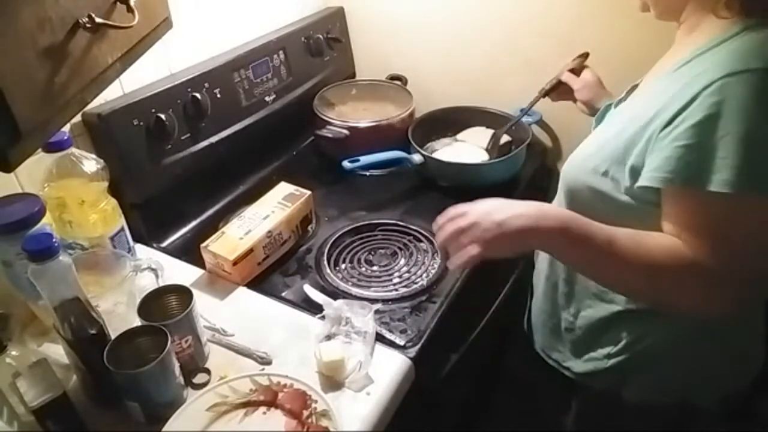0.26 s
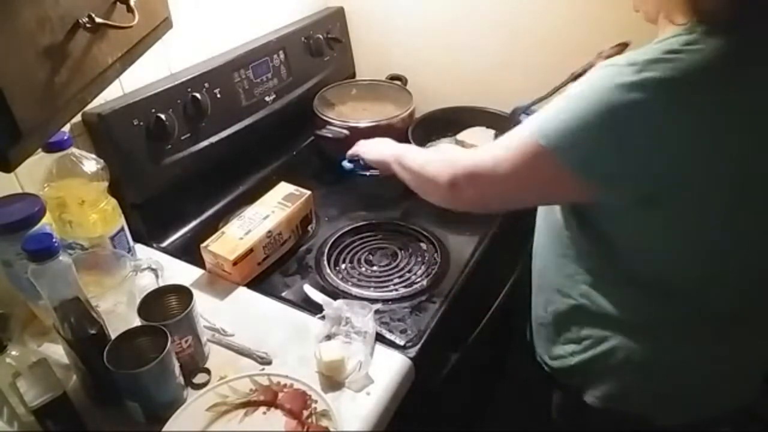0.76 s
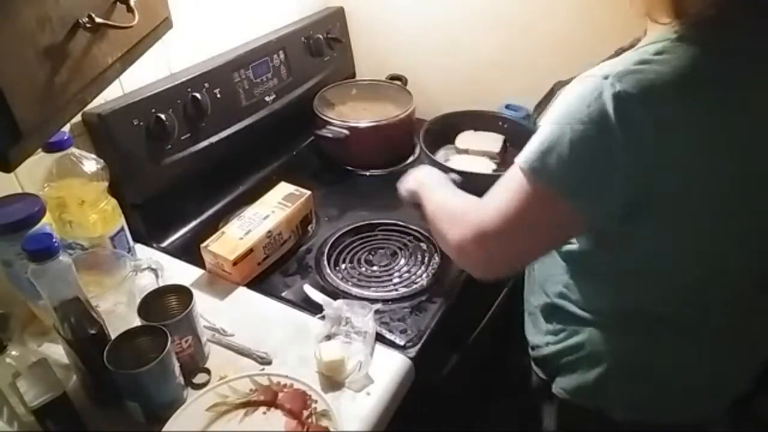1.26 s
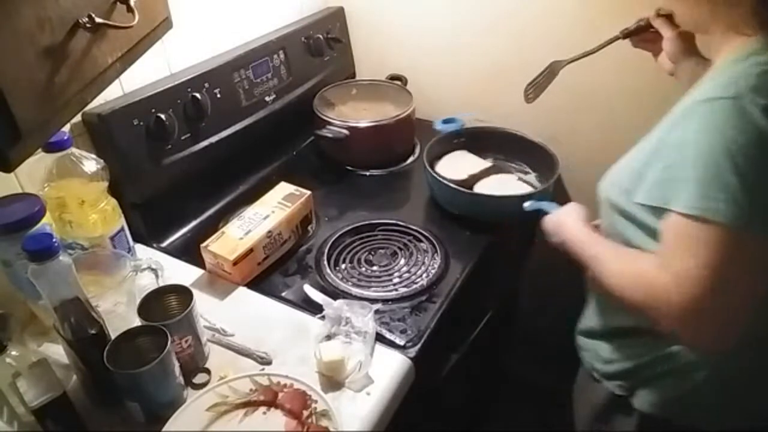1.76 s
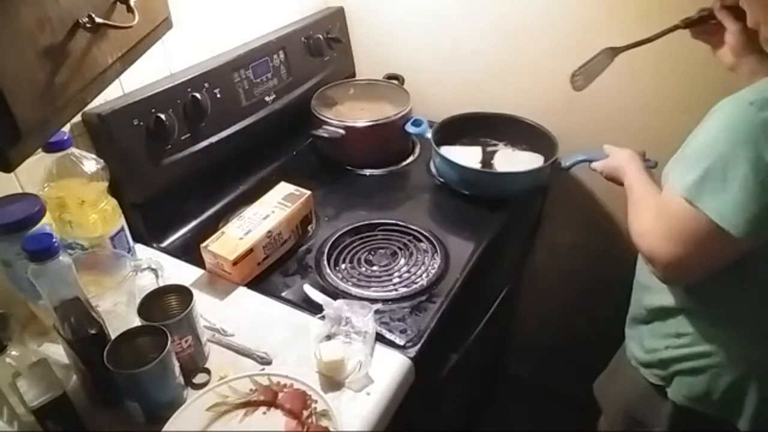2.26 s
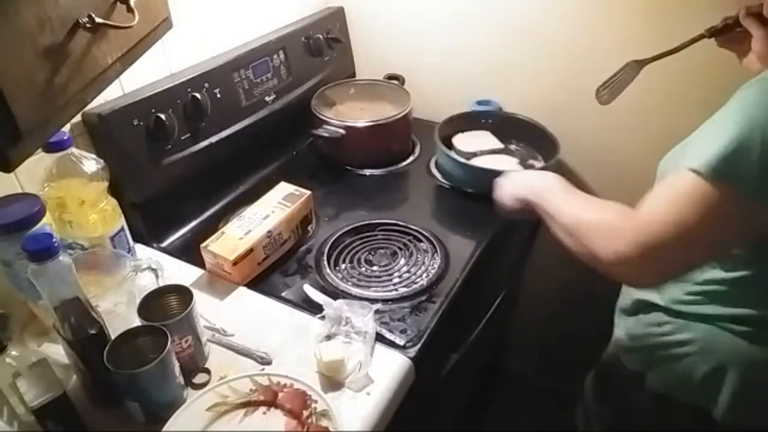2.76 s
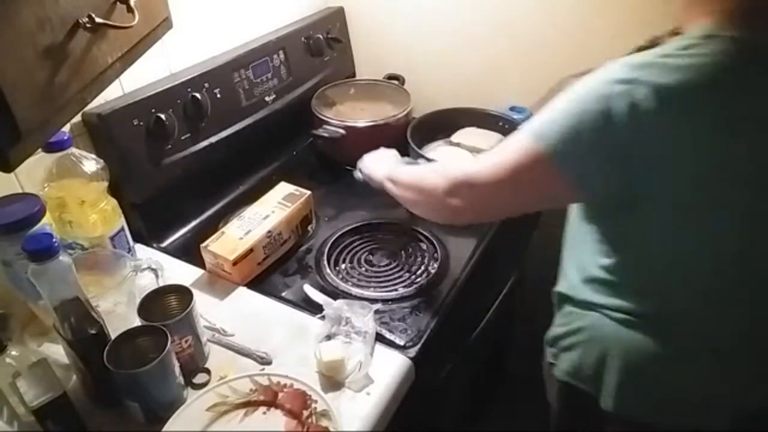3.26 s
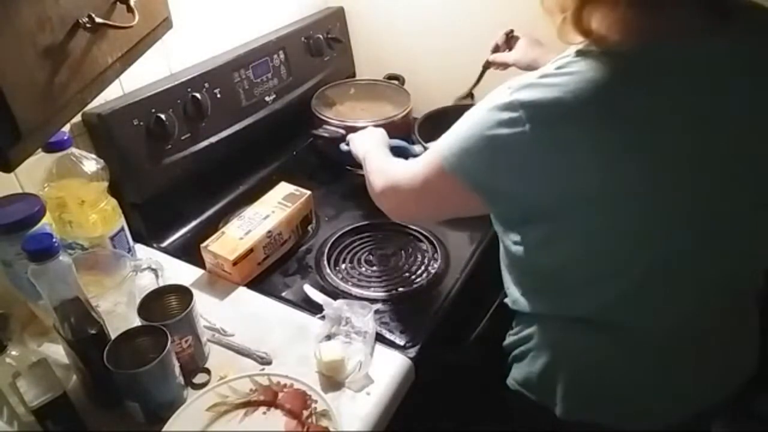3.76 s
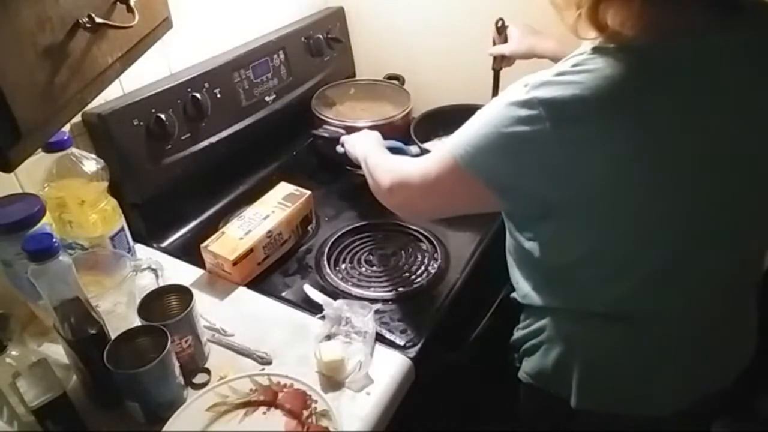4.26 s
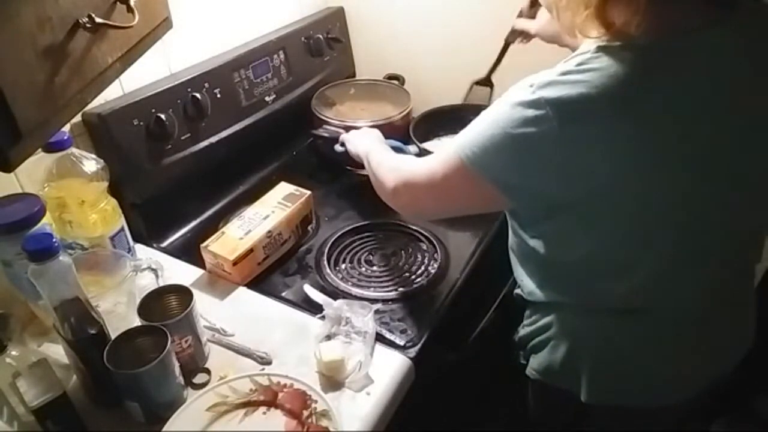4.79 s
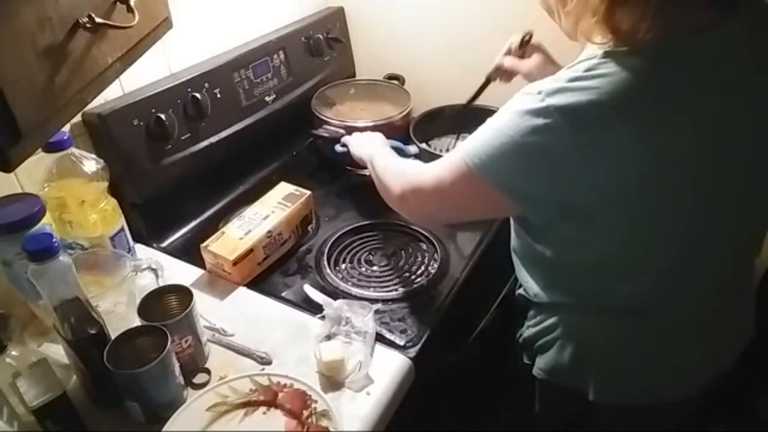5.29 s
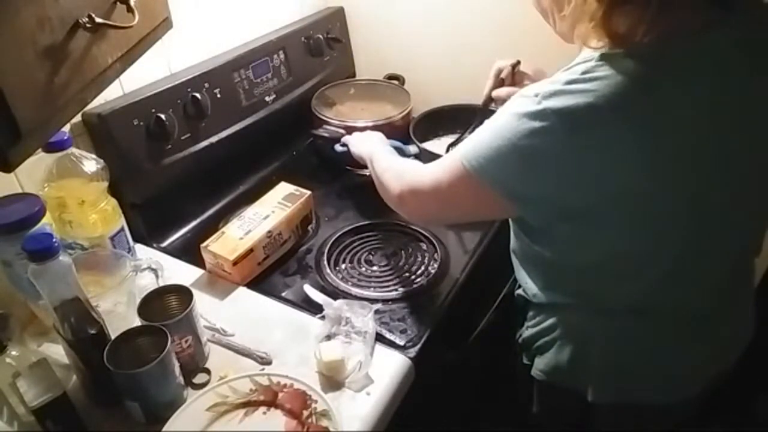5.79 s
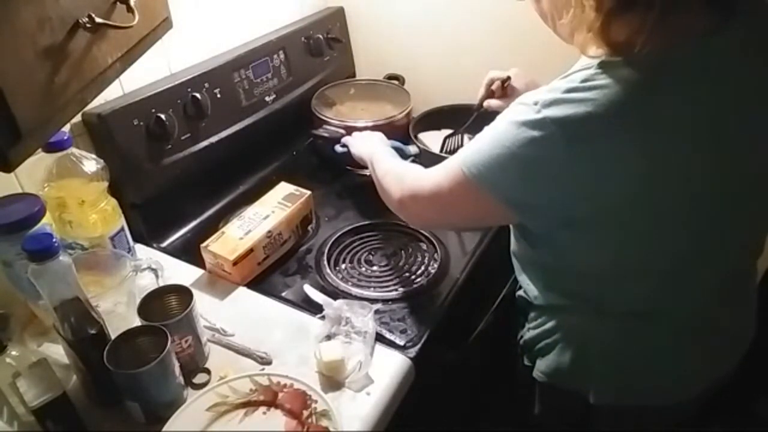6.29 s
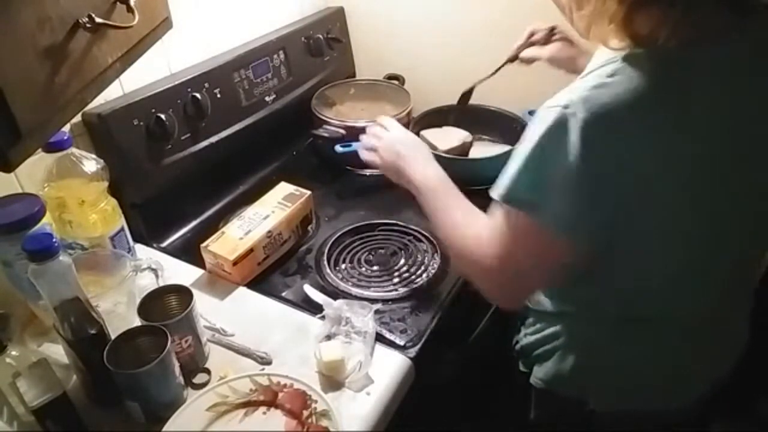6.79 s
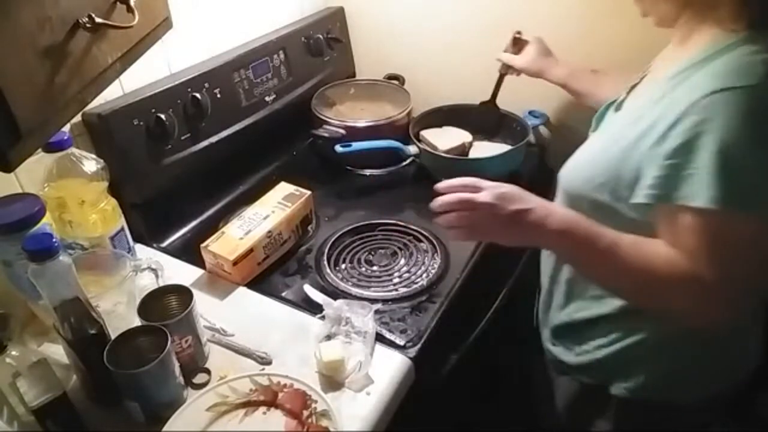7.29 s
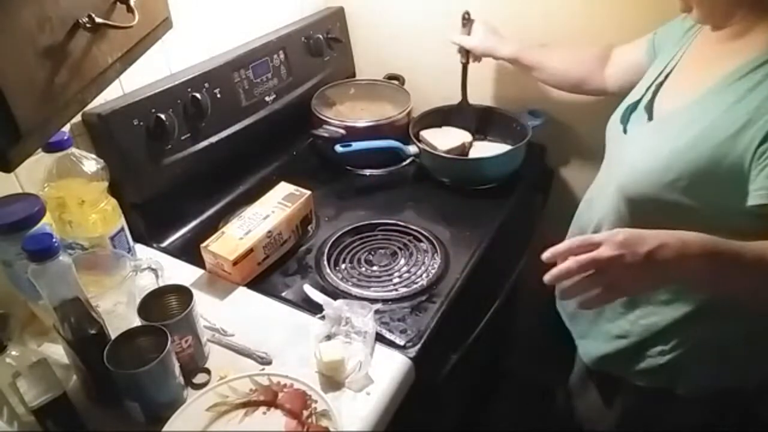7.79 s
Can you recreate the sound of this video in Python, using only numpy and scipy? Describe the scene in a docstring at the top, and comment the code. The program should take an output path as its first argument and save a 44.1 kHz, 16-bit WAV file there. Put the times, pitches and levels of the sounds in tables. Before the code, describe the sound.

A heavy skillet scrapes, clanks and bumps across an electric stove coil, then a spatula taps and rubs in the pan over a steady fan hum.

```python
"""A skillet is dragged round on the coil of an electric range in a small kitchen: it scrapes, clanks and bumps down.
A spatula pushes food about and taps the pan, at the start and again after the dragging.
A fan hums throughout and the fat crackles faintly.
Blows are clicks with rebounds that ring damped modes; scraping and rubbing are dense random slips that
excite resonances; the fat is sparse clicks; the fan is wavering sines over coloured noise."""
import sys
import numpy as np
from scipy import signal
from scipy.fft import rfft, irfft
from scipy.io import wavfile

SR = 44100
rng = np.random.default_rng(int(sys.argv[2]) if len(sys.argv) > 2 else 0)


def inscribe(sig):
    """Save sig as 16-bit PCM at rate SR to the path in sys.argv[1].

    A 1-D sig is mono; a 2-D sig holds one channel per row.
    Samples are clipped to [-1, 1] before scaling.
    """
    pcm = np.round(np.clip(np.atleast_2d(sig).T, -1, 1) * 32767)
    wavfile.write(sys.argv[1], SR, pcm.astype(np.int16))


N = 354563

# the skillet clanks on the range:
# (time [s], level [dB], hardness [Hz], contact pitch [Hz], contact level [dB], tick level [dB])
SKILLET_CLANKS = [(1.1715, -23, 2170, 555, -3, -32), (1.2170, -33.5, 2260, 900, -1, -24),
                  (1.2775, -30.5, 1370, 584, -3, -41), (1.6305, -29, 2560, 602, -5, -16),
                  (1.7915, -15.5, 2800, 895, -26, -13), (1.8220, -22, 2450, 1340, 6, -28),
                  (1.8430, -23.5, 1090, 246, -3, -23), (2.4630, -45, 4000, 1130, -2, -17),
                  (2.9640, -50, 3470, 2230, -5, -27), (3.0400, -46.5, 1880, 590, 7, -39),
                  (3.1605, -31, 990, 700, 2, -40), (3.2495, -40, 2460, 1940, 0, -30),
                  (3.3060, -50, 1200, 704, -6, -31), (3.3690, -58.5, 4000, 3100, 10, -9)]
# dull bumps that set the range's sheet metal booming: same columns
RANGE_BUMPS = [(0.7965, -31, 637, 478, -3, -34), (2.6555, -25, 473, 300, 1, -31),
               (3.1575, -23, 850, 136.5, -3.5, -41)]
# the spatula meets the pan: same columns
SPATULA_TAPS = [(0.7410, -55.5, 1200, 920, 3, -15), (3.6365, -44, 4500, 2560, -6.5, -7.5),
                (3.7770, -44.5, 2500, 495, 12, -20), (3.8730, -55, 1500, 555, 1, -36),
                (4.9170, -33.5, 1290, 787, -6.5, -28.5), (5.6205, -24.5, 1620, 628, 7, -31.5),
                (6.9835, -41, 4200, 1846, 3.5, -15), (7.1540, -59.5, 3980, 3190, -1, -13),
                (7.2285, -45.5, 1000, 480, 1.5, -40), (7.2430, -56, 6000, 6200, -4, -5),
                (7.3780, -55.5, 3440, 2600, -6, -41), (7.9380, -49.5, 1000, 516, 5, -20)]
# the skillet is pushed over the coil:
# (fastest at [s], speeding up [s], slowing down [s], rasp [dB], dull rubbing [dB])
SKILLET_PUSHES = [(.92, 0.26, 0.18, -51, -65), (1.27, 0.38, 0.37, -41.5, -45.5),
                  (1.77, 0.42, 0.51, -36.5, -43), (2.48, 0.43, 0.39, -40.5, -42),
                  (3.02, 0.32, 0.58, -50.5, -48.5), (3.43, 0.12, 0.85, -54, -54.5)]
# the spatula is drawn through the pan:
# (firmest at [s], pressing [s], easing [s], rasp [dB], rubbing of food [dB])
SPATULA_STROKES = [(0, .05, 0.054, -59, -43), (.25, 0.22, 0.21, -52, -44.5), (4.2, 0.84, 0.72, -60, -59),
                   (5.99, 0.11, 0.091, -58, -54), (6.16, 0.26, 0.11, -65, -46.5),
                   (6.87, 0.13, 0.49, -59, -67), (7.61, 0.095, 0.22, -48.5, -49),
                   (7.92, 0.23, .16, -55.5, -52.5)]
# modes of the skillet on its coil: (frequency [Hz], level [dB], t60 [s])
PAN_MODES = [(186, -5, .28), (258, -3, .3), (316, -7, .22), (472, -9, .2), (571, -8, .14), (918, -4, .22),
             (1041, -4, .17), (1166, -5, .19), (1352, -2, .19), (1391, -1, .15), (1641, -9, .18),
             (1780, -10, .22), (1945, -6, .18), (2178, -6, .14), (2510, -7, .15), (2850, -7, .13),
             (3860, -8, .1), (8452, -4, .08)]
# modes of the range top: (frequency [Hz], level [dB], t60 [s])
RANGE_MODES = [(60, 1, .3), (140, 9.5, 0.17), (178, 8.5, 0.26), (290.3, 16.5, 0.13), (329, 13.5, 0.16),
               (454, 9, .11)]
# resonances under rubbing: (frequency [Hz], level [dB], t60 [s])
RUBBING_MODES = [(300, 1.5, 0.11), (510, 9.5, 0.034), (609, 5, 0.094), (944, 10, 0.021)]
# the short resonance of a contact: (multiple of its pitch [ratio], level [dB])
TOUCH_MODES = [(1, 1), (1.43, -6), (3.28, -14.5)]
# spectrum of metal rasping: (frequency [Hz], level per Hz [dB])
RASP_SPECTRUM = [(60, -34), (250, 5), (600, -4.5), (780, 7.5), (1000, 5), (1400, 3), (2000, 3), (3200, 3),
                 (4500, -3.5), (8000, -7.5), (15000, -8)]
# spectrum of the fan's rushing air: (frequency [Hz], level per Hz [dB])
AIR_SPECTRUM = [(30, -14.5), (60, -25), (100, -13), (150, -13), (215, -8.5), (255, 2), (310, -6),
                (480, -11), (680, -15), (1000, -9.5), (1350, -19.5), (2700, -20), (4000, -25.5),
                (9000, -34)]
# fan hum: (multiple of the shaft rate [ratio], level [dB])
HUM_ORDERS = [(3, -67), (4, -68), (5, -68), (6, -66), (7, -62.5), (14, -73), (17, -74)]
# kitchen reverberation: (frequency [Hz], t60 [s])
KITCHEN_T60 = [(80, 0.6), (250, 0.33), (1000, 0.24), (3000, 0.29), (12000, 0.22)]
# microphone response: (frequency [Hz], level [dB])
MIC_RESPONSE = [(25, -12.5), (70, 6.5), (3000, -0.5), (3950, -2.5), (4800, -11), (6500, -8), (7700, -9),
                (8500, -7), (10500, -15), (15500, -24)]
# spectrum of microphone hiss: (frequency [Hz], level per Hz [dB])
HISS_SPECTRUM = [(1000, -20), (7700, -2.5), (8300, 8.5), (11000, 8), (16000, 9)]

FAN_HZ = 59.22   # mean shaft rate
CUTOFF_HZ = 15900
RUB_LAG_S = 0.072   # the base rubs hardest as a push runs out
# a firm blow is the yardstick; weaker ones rebound more briefly and more faintly
FIRM_BLOW_DB, REBOUND_HALVES_DB, REBOUND_DB_PER_DB = -25, 26, .2
# a contact of this pitch has its kind's low cut; smaller, higher contacts have less bass
MID_CONTACT_HZ = 600

TIME = np.arange(N) / SR
AGE = TIME[:SR * 3 // 5]   # time since a blow or impulse
EDGES = np.geomspace(35, 19000, 23)   # reverberation bands, Hz
BANDS = [signal.butter(2, pair, "band", fs=SR, output="sos") for pair in zip(EDGES, EDGES[1:])]


def skillet_clanks():
    """Hard, brief contacts ring the skillet's modes."""
    return blows(SKILLET_CLANKS, PAN_MODES, contact_db=-8.5, ring_db=-18.5, contact_t60=0.016,
                 contact_wet_db=0.0, tick_dry_db=2.0, low_hz=252, thinning=0.26,
                 rebound_db=-4.5, rebound_s=.022)


def range_bumps():
    """Dull contacts boom in the low modes of the range top."""
    return blows(RANGE_BUMPS, RANGE_MODES, contact_db=-14.5, ring_db=-29.5, contact_t60=0.081,
                 contact_wet_db=-3.0, tick_dry_db=-10.0, low_hz=116, thinning=0.1,
                 rebound_db=-7.0, rebound_s=.021)


def friction(gain, ring_db, judder_db, grit_db, brighten=0.11):
    """Metal on metal: thousands of tiny slips a second and a few coarser catches rasp and keep the pan ringing."""
    slips = grains(per_s=3000, spread_db=5.5) * from_db(judder_db * drift(50))
    slips = slips + from_db(grit_db) * grains(per_s=60, spread_db=2.5)
    pan_ring = signal.fftconvolve(slips, ringing(PAN_MODES))[:N]
    motion = slips + from_db(ring_db) * pan_ring
    rasp = in_room(coloured(motion, RASP_SPECTRUM))
    dull = cut(rasp, 4500, "low", order=1)
    # firmer sliding makes sharper slips
    sharpness = 0.95 * (gain / gain.max()) ** brighten
    return gain * (dull + sharpness * (rasp - dull))


def rubbing(gain):
    """Slower, softer slips reach only the low resonances."""
    slips = grains(per_s=900, spread_db=3.5)
    resonance = signal.fftconvolve(slips, ringing(RUBBING_MODES))[:N]
    return gain * in_room(resonance)


def spatula_taps():
    """Longer contact resonances, thinner when high-pitched, ring the pan."""
    return blows(SPATULA_TAPS, PAN_MODES, contact_db=-9.0, ring_db=-17.0, contact_t60=0.045,
                 contact_wet_db=5.5, tick_dry_db=1.0, low_hz=272, thinning=0.88,
                 rebound_db=-8.0, rebound_s=.018)


def blows(rows, modes, contact_db, ring_db, contact_t60, contact_wet_db, tick_dry_db, low_hz, thinning,
          rebound_db, rebound_s, press_cycles=2.7, count=5):
    """Each blow is a click and a few rebounds that ring the struck thing; level is the rms over 50 ms."""
    out = np.zeros(N + len(AGE))
    click = signal.unit_impulse(len(AGE))
    for s, db, hard_hz, pitch_hz, pitch_db, tick_db in rows:
        rattle_s = rebound_s * 2 ** ((db - FIRM_BLOW_DB) / REBOUND_HALVES_DB)
        rattle_db = rebound_db + REBOUND_DB_PER_DB * (db - FIRM_BLOW_DB)
        force = click.copy()
        rebounds = (np.arange(count) + rng.uniform(.3, 1.7, count)) / count * rattle_s
        sizes = from_db(rattle_db - 9.1 * np.linspace(0, 1, count))
        force[(rebounds * SR).astype(int)] += sizes * rng.choice([-1, 1], count)

        # a short resonance depends on where the contact is; the body's modes ring on
        room = kitchen()
        contact = ringing([(pitch_hz * ratio, mode_db, contact_t60) for ratio, mode_db in TOUCH_MODES])
        contact_echo = signal.fftconvolve(contact, room)[:len(AGE)]
        contact = contact + from_db(contact_wet_db) * unit(contact_echo)
        motion = signal.fftconvolve(force, room + from_db(ring_db) * ringing(modes))[:len(AGE)]
        motion = unit(motion) + from_db(contact_db + pitch_db) * unit(contact)

        # a soft contact loses its treble, a small one its bass
        soft = cut(motion, hard_hz, "low")
        bass_cut_hz = low_hz * (pitch_hz / MID_CONTACT_HZ) ** thinning
        sound = cut(soft, bass_cut_hz, "high", order=3)
        # a soft contact also takes longer to press home
        sound = sound * (1 - np.exp(-AGE * hard_hz / press_cycles))

        # the first touch of a hard edge cracks for a few milliseconds
        crack = unit(rng.standard_normal(len(AGE)) * np.exp(-AGE / .0025))
        tick = cut(motion + from_db(tick_dry_db) * crack, 4100, "high")
        sound = sound - from_db(tick_db) * tick
        start = round(s * SR)
        heard = unit(coloured(sound, MIC_RESPONSE)) * np.sqrt(SR / 20)
        out[start:start + len(AGE)] += from_db(db) * heard
    return out[:N]


def gestures(rows, curve, lag_s=0):
    """Each movement speeds up and slows down evenly, and loudness follows speed; gains of rasp and of rubbing."""
    rasp, rub = np.zeros((2, N))
    for s, rise_s, fall_s, rasp_db, rub_db in rows:
        corners = [s - rise_s, s, s + fall_s]
        speed = np.interp(TIME, corners, [0, 1, 0])
        late_speed = np.interp(TIME - lag_s, corners, [0, 1, 0])
        rasp = np.hypot(rasp, from_db(rasp_db) * speed ** curve)
        rub = np.hypot(rub, from_db(rub_db) * late_speed ** curve)
    return rasp, rub


def crackle(burst_db=-78.0):
    """Sparse tiny bursts in the warm fat."""
    bursts = grains(per_s=14, spread_db=1.3)
    return from_db(burst_db) * in_room(cut(bursts, 4500, "high"))


def fan(air_db=-52.5, waver_db=4.0):
    """Rushing air and the wavering orders of the shaft."""
    turns = np.cumsum(FAN_HZ * (1 + 0.0013 * drift(3.014))) / SR
    hum = np.zeros(N)
    for order, db in HUM_ORDERS:
        level = from_db(db + waver_db * drift(2.32))
        hum += level * np.sin(2 * np.pi * (order * turns + rng.random()))
    air = coloured(coloured(rng.standard_normal(N), AIR_SPECTRUM), MIC_RESPONSE)
    return hum + from_db(air_db) * rms_one(air)


def kitchen(direct_db=-10.5, near_t60=0.075, far_db=-9.5, build_s=0.002):
    """Direct sound, a dense flurry from hob and wall, then the room's tail."""
    white = rng.standard_normal((2, len(AGE)))
    out = np.zeros(len(AGE))
    for k, (low, high, band) in enumerate(zip(EDGES, EDGES[1:], BANDS)):
        tail = from_db(far_db - 60 * AGE / at_hz(KITCHEN_T60, np.sqrt(low * high)))
        flurry = from_db(-60 * AGE / near_t60)
        fade = np.hypot(flurry, tail) * (1 - np.exp(-AGE / build_s))
        # neighbouring bands take different noise; energy goes with bandwidth
        echoes = signal.sosfilt(band, white[k % 2] * fade)
        out += unit(echoes) * np.sqrt(2 * (high - low) / SR)
    out[0] += from_db(direct_db)
    return out


def in_room(x, paths_per_s=14.0, count=4):
    """A source at rms one: its echo paths keep changing, in turn, on the way to the microphone."""
    path = (TIME * paths_per_s).astype(int) % count
    wet = sum(signal.oaconvolve(x * (path == k), kitchen())[:N] for k in range(count))
    return rms_one(coloured(wet, MIC_RESPONSE))


def grains(per_s, spread_db):
    """Random clicks of uneven size, together at rms one."""
    sizes = from_db(spread_db * np.minimum(rng.exponential(1, N), 5))
    sizes = sizes * rng.choice([-1, 1], N)
    return rms_one(sizes * (rng.random(N) < per_s / SR))


def ringing(modes):
    """Impulse response of damped modes, each with its own energy."""
    out = np.zeros(len(AGE))
    for hz, db, t60 in modes:
        decay = from_db(-60 * AGE / t60)
        out += from_db(db) * unit(np.cos(2 * np.pi * hz * AGE) * decay)
    return out


def drift(rate):
    """Slow chance with a spread of about one; rate is new values per second."""
    return np.interp(TIME * rate, np.arange(N), rng.standard_normal(N))


def coloured(x, spectrum, size=4096):
    """Causal (minimum-phase) filter with the given spectrum."""
    gains = from_db(at_hz(spectrum, np.linspace(0, SR / 2, size // 2 + 1)))
    cepstrum = irfft(np.log(gains))
    folded = np.r_[cepstrum[0], 2 * cepstrum[1:size // 2]]
    response = irfft(np.exp(rfft(folded, size)))
    return signal.fftconvolve(x, response)[:len(x)]


def cut(x, hz, kind, order=2):
    """Butterworth filter."""
    hz = np.clip(hz, 10, .45 * SR)
    return signal.sosfilt(signal.butter(order, hz, kind, fs=SR, output="sos"), x)


def at_hz(points, hz):
    """Read a table on a log-frequency axis."""
    f, value = np.transpose(points)
    return np.interp(np.log(hz + 1e-9), np.log(f), value)


def from_db(db):
    """Decibels to gain."""
    return 10 ** (np.asarray(db) / 20)


def unit(x):
    """Scale to an energy of one."""
    return x / np.sqrt(np.sum(x ** 2) + 1e-30)


def rms_one(x):
    """Scale to an rms of one."""
    return unit(x) * np.sqrt(len(x))


def scene():
    """Skillet, spatula, fat and fan."""
    slide_gain, base_gain = gestures(SKILLET_PUSHES, curve=1.304, lag_s=RUB_LAG_S)
    scrape_gain, food_gain = gestures(SPATULA_STROKES, curve=1.37)
    slide = friction(slide_gain, ring_db=-37.0, judder_db=2.0, grit_db=-4.5)
    scrape = friction(scrape_gain, ring_db=-38.0, judder_db=3.5, grit_db=-10.5)
    rub = rubbing(np.hypot(base_gain, food_gain))
    skillet = skillet_clanks() + range_bumps() + slide
    spatula = spatula_taps() + scrape
    return (skillet + spatula + rub + crackle() + fan())[None]


def record(dry, hiss_db=-72.5, dip_db=-11.0, dip_s=0.0043):
    """Microphone hiss; the level dips briefly once; the top is cut."""
    x = dry + from_db(hiss_db) * rms_one(coloured(rng.standard_normal(N), HISS_SPECTRUM))
    x = x * from_db(dip_db * np.exp(-((TIME - 7.417) / dip_s) ** 2))
    return signal.sosfilt(signal.ellip(12, .1, 110, CUTOFF_HZ, fs=SR, output="sos"), x)


dry = scene()
out = record(dry)
inscribe(out)
```